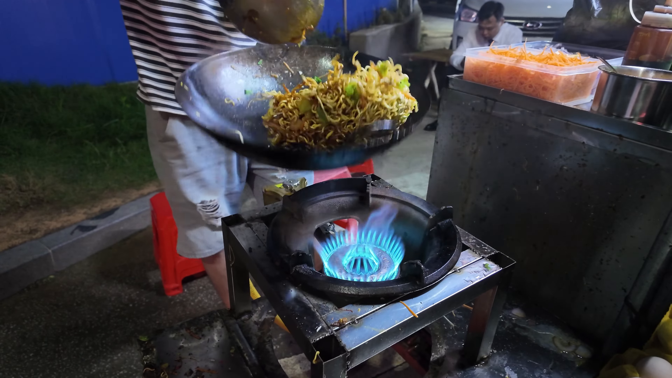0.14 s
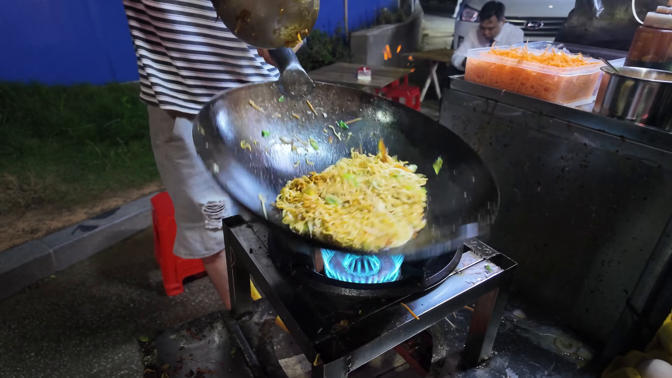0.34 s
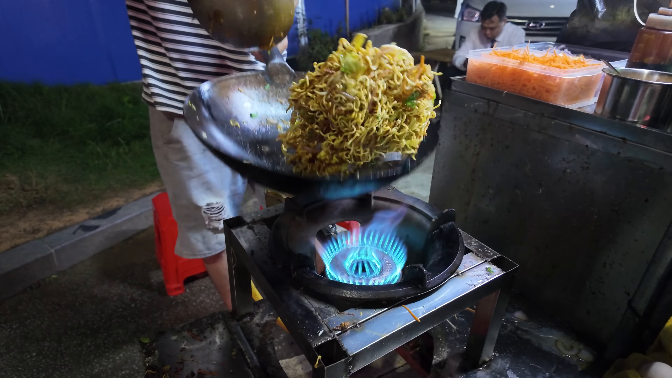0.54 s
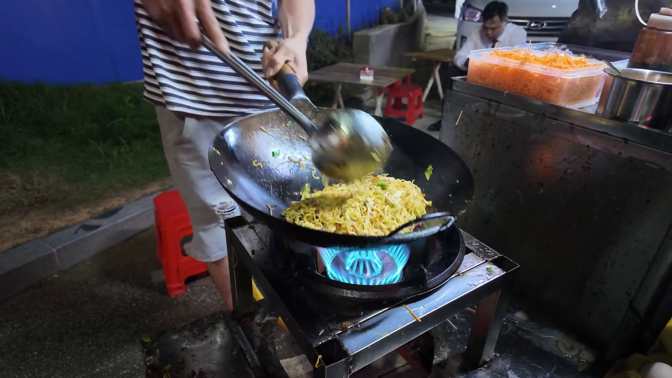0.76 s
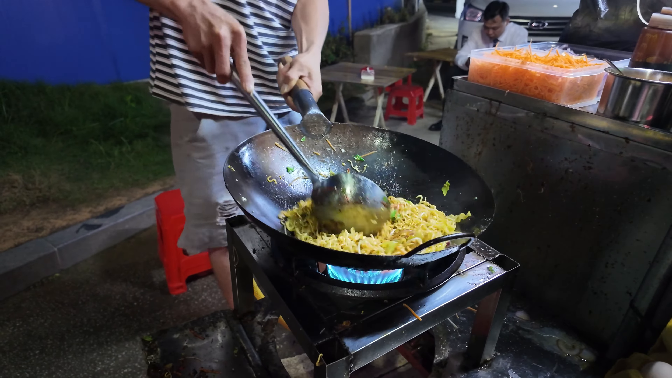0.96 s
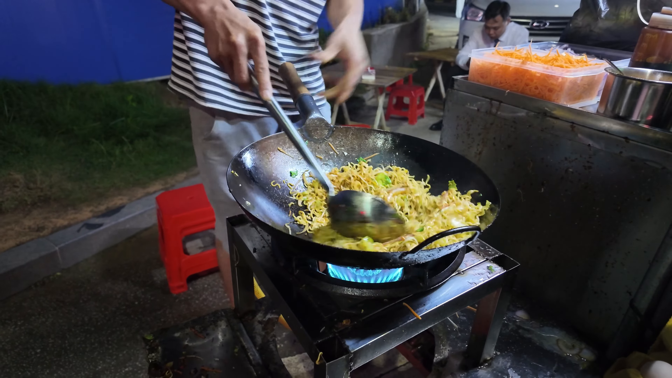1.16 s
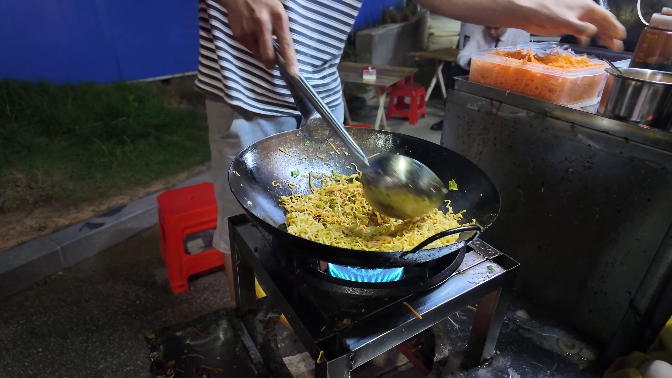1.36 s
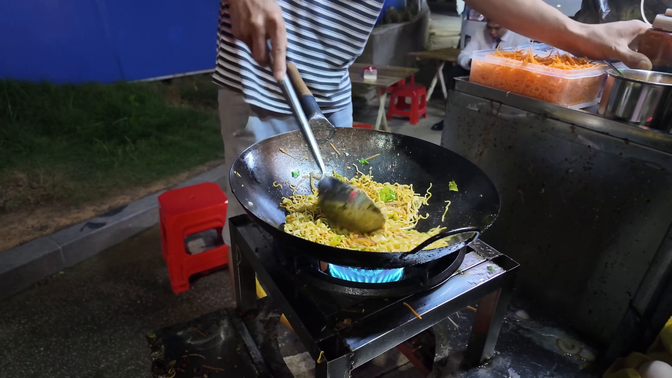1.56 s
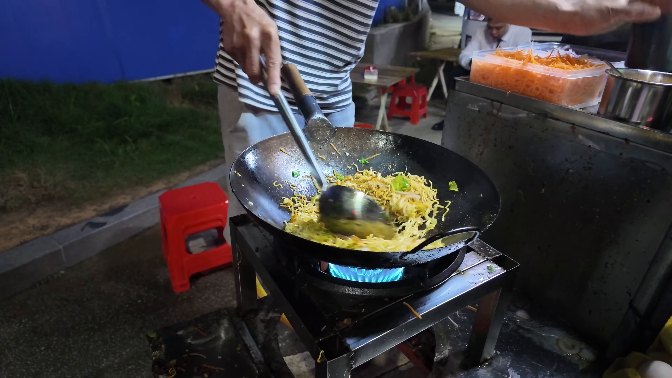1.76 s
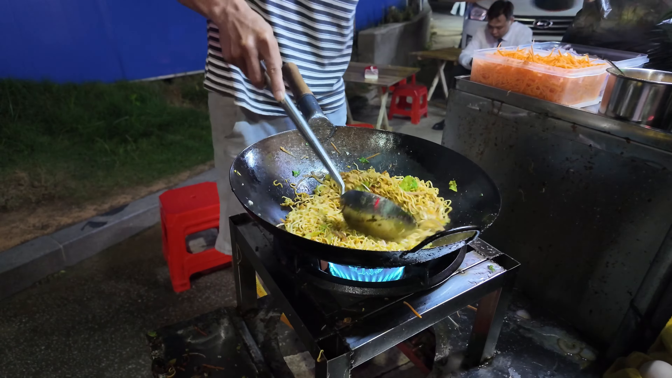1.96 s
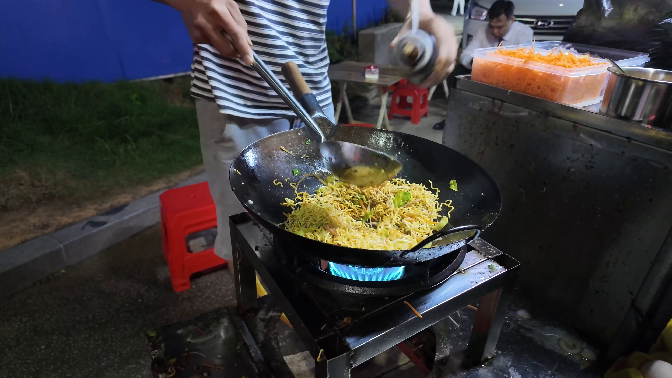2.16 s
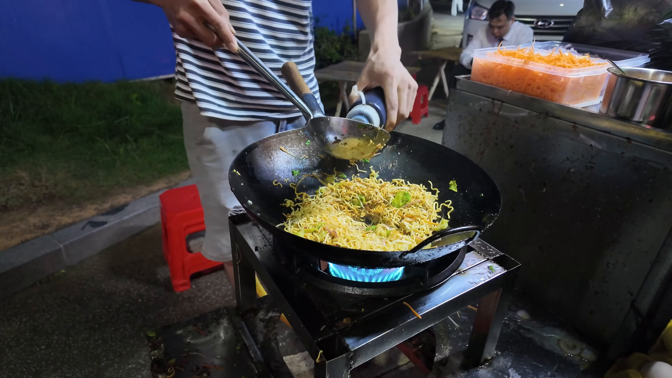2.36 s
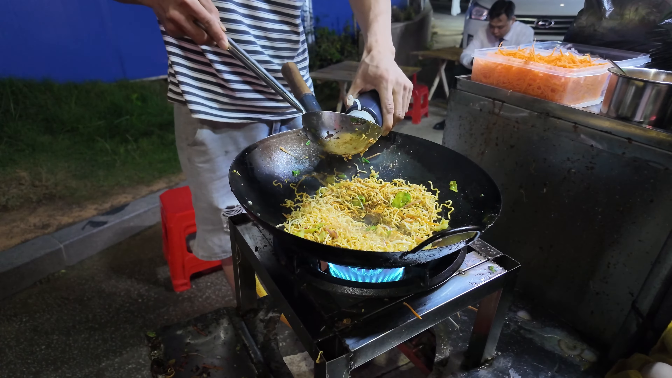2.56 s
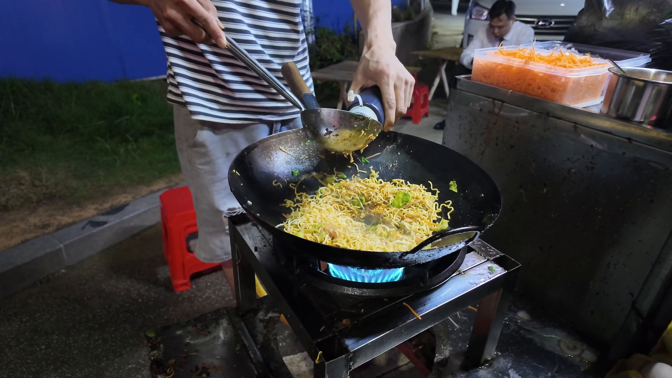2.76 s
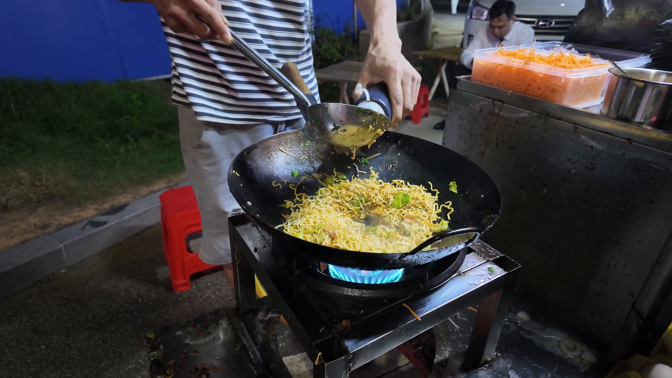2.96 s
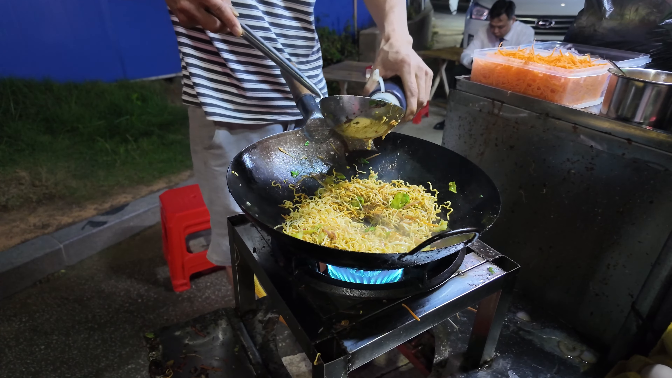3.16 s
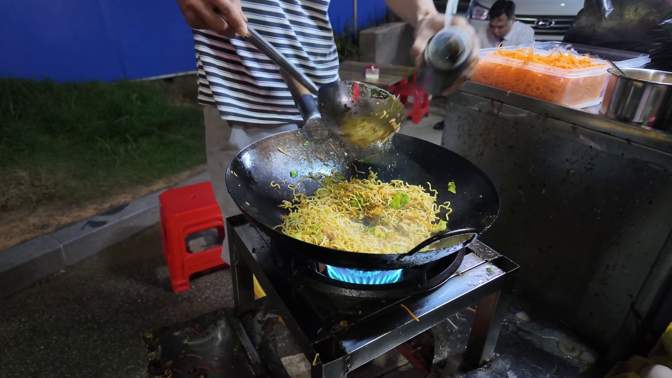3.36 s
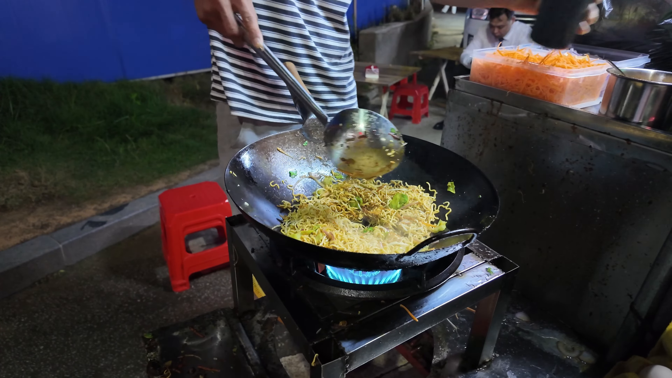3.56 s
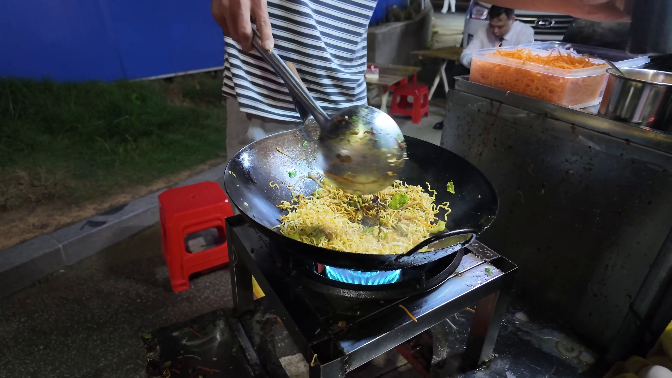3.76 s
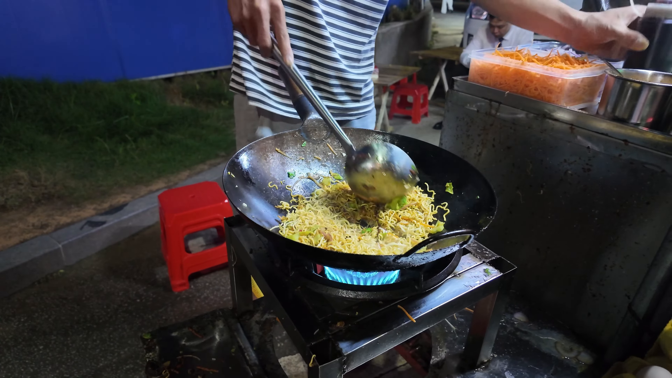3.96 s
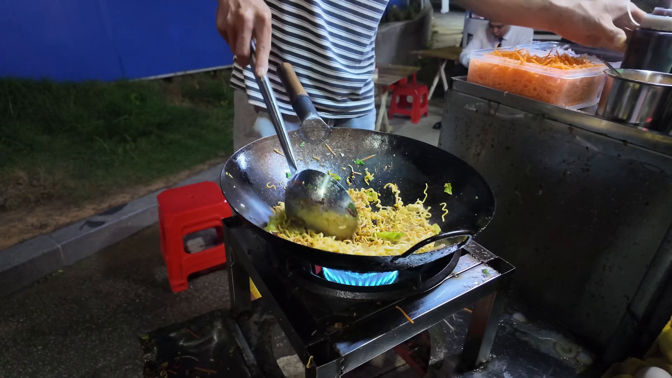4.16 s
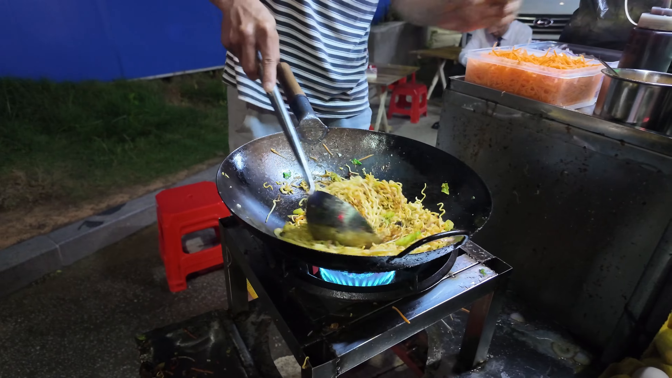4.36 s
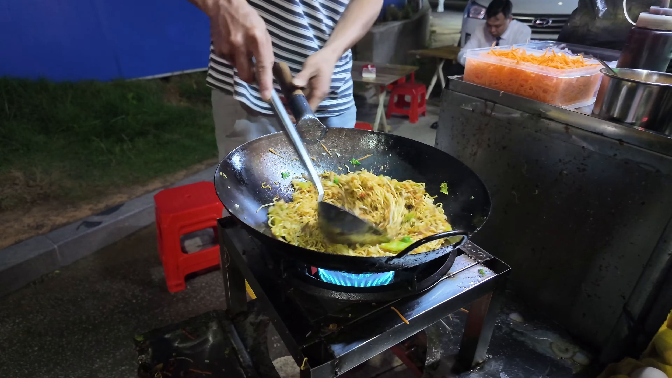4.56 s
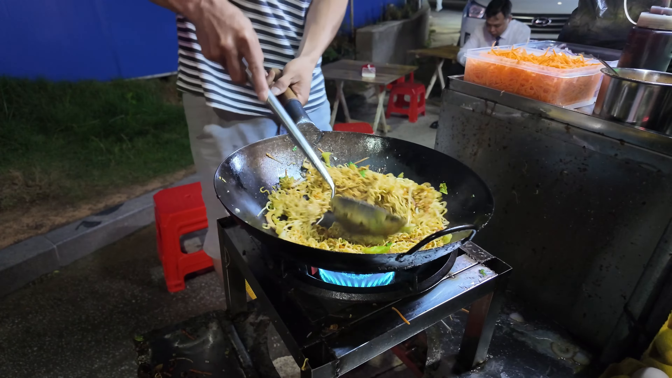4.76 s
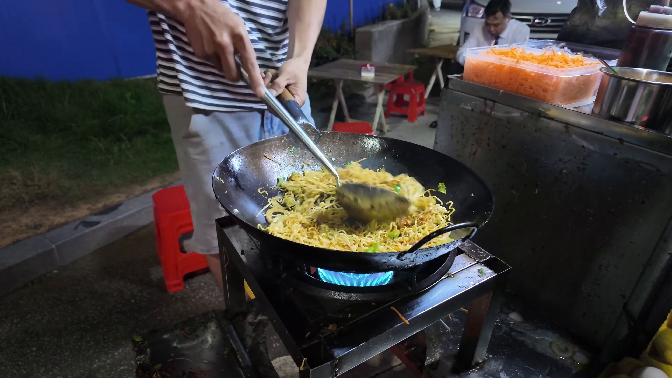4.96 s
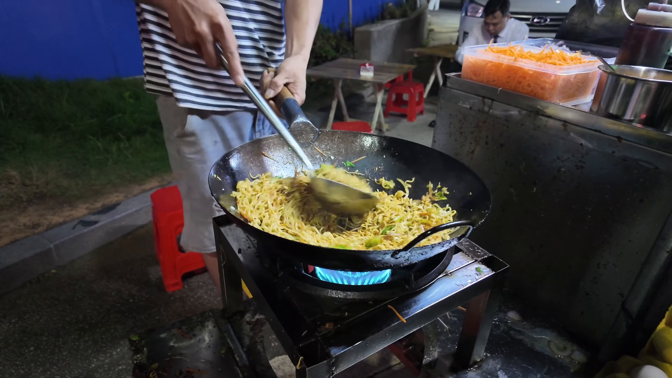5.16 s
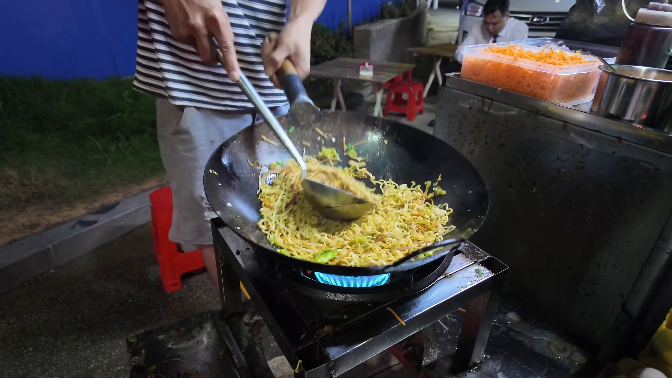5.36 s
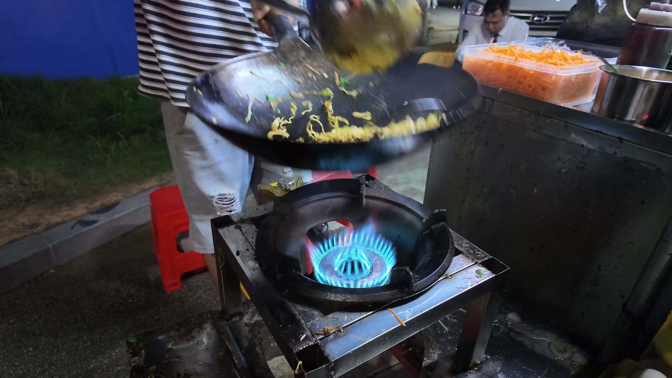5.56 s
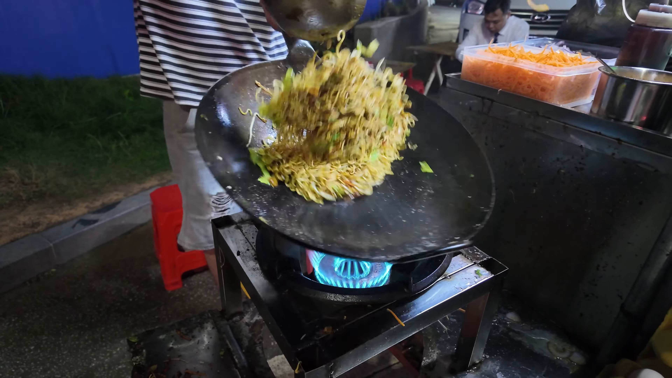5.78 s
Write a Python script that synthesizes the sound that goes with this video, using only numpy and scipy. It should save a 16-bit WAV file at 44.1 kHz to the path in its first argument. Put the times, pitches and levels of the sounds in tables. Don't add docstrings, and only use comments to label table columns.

```python
import sys
import numpy as np
from scipy import signal
from scipy.fft import rfft, irfft, next_fast_len
from scipy.io import wavfile
from scipy.ndimage import uniform_filter1d, map_coordinates

SR = 44100
rng = np.random.default_rng(int(sys.argv[2]) if len(sys.argv) > 2 else 0)


def persist_wave(psi):
    counts = np.round(np.clip(psi, -1, 1) * 32767).astype(np.int16)
    wavfile.write(sys.argv[1], SR, np.atleast_2d(counts).T)


def gain_from_db(level_db):
    decades = np.asarray(level_db, float) / 20
    return 10 ** decades


N = 256662

# [f/Hz, likeness/0-1]
LIKENESS = [(20, 0.97), (100, 1), (300, 0.98), (700, 0.83), (1400, 0.71), (2400, 0.92), (4500, 0.73),
            (7500, 0.64), (11000, 0.33), (15000, 0.46)]
# [f/Hz, lag/rad]
PORT_LAG = [(150, 0), (350, .17), (1400, .22), (5500, .25), (9600, .75), (13000, 1.1), (15800, 2.2)]
# [f/Hz, t60/s]
STALL_DECAY = [(200, 0.29), (2000, 0.076), (10000, 0.11)]

# [f/Hz, level/dB per Hz]
ROAR_COLOUR = [(18, -69), (30, -33), (46, -16), (59, -7), (91, -7.5), (123, -6), (157, -4.5), (225, -1.5),
               (295, -6.5), (360, -23.5), (470, -52), (790, -120)]
# [f/Hz, level/dB per Hz]
GAP_COLOUR = [(350, -45), (600, -26), (622, -14.5), (689, 0.5), (802, -2.5), (899, 2), (1250, -16.5),
              (1800, -27), (2340, -32), (3960, -120)]
# [f/Hz, level/dB per Hz]
JETS_COLOUR = [(250, -39), (340, -7), (420, 2), (500, 4.5), (600, -3), (700, -4.5), (1000, -37)]
# [t/s, level/dB]
GUSTS = [(.085, 10.5), (1.67, 3.5), (2.28, 0), (3.3, 4.5), (4.35, 2.5), (3.95, 6), (4.65, 7), (4.8, 3),
         (5.56, 9)]
# [t/s, lifted/0-1]
LIFTED = [
    (0, 1),
    (.69, 1),
    (.72, 0),
    (5.6, 0),
    (5.7, 1),
]
# [t/s, level/dB]
DRAUGHT = [(0, -2), (.3, -0.5), (1.5, 1.5), (2, -1), (3.3, 1), (3.6, -2.5), (3.8, 1), (4.25, -4), (5.1, 2),
           (5.5, 2.5), (5.82, -2)]
ROAR_DB, GAP_DB, JETS_DB = -49.5, -52.5, -59.5
GUST_S, GAP_SHARE, JETS_SHARE = 0.024, 0.2, 1
OPEN_GAP_DB, OPEN_JETS_DB = -2, 2.5

# [f/Hz, level/dB per Hz]
OIL_COLOUR = [(760, -26), (1300, -11), (1720, -12.5), (2220, -12.5), (2620, -11.5), (3900, -2.5),
              (4660, -2), (4910, -3.5), (6110, -3), (7080, -4.5), (12300, -2.5), (15800, -5.5)]
# [f/Hz, level/dB per Hz]
FIZZ_COLOUR = [(4000, -33), (8000, -6.5), (12500, -2), (15800, -1)]
# [f/Hz, level/dB per Hz]
SLIDE_COLOUR = [(500, -22), (1200, -16), (1700, -8), (2100, -1), (2900, -1), (3750, 2.5), (4600, -2),
                (6000, -7.5), (9000, -8.5), (15000, -45)]
# [t/s, level/dB]
SIZZLE = [(0, -52), (.2, -53.5), (.56, -65), (.7, -55), (.77, -38.5), (1.2, -38.5), (1.6, -39.5),
          (2.15, -40.5), (2.3, -39.5), (2.7, -43), (3.2, -46), (3.55, -49.5), (4.03, -46), (4.25, -42),
          (4.55, -35.5), (5.58, -38), (5.69, -63), (5.82, -49)]
# [t/s, spit level/dB, slide level/dB, half length/s]
STROKES = [(0.002, -33.5, -55, 0.066), (0.09, -35, -36, 0.049), (0.402, -30.5, -32.5, 0.063),
           (0.485, -52, -42, 0.023), (0.857, -41, -33.5, 0.066), (1.074, -36.5, -28.5, 0.032),
           (1.175, -39, -38, 0.092), (1.266, -40.5, -35.5, .04), (1.412, -39.5, -53, 0.026),
           (1.511, -40, -31.5, 0.021), (1.637, -56, -32, 0.063), (1.788, -37.5, -37.5, 0.03),
           (1.922, -38.5, -36, .04), (2.045, -33.5, -32, .03), (2.438, -42, -56, 0.01),
           (2.895, -46, -45, 0.028), (3.082, -44, -60, 0.013), (4.12, -37.5, -36, 0.045),
           (4.155, -50, -34.5, 0.023), (4.364, -38, -31.5, 0.079), (4.58, -34, -41, 0.041),
           (4.645, -37.5, -31.5, 0.027), (4.868, -34.5, -33, 0.033), (5.09, -34.5, -36.5, 0.037),
           (5.28, -31, -53, 0.035), (5.314, -33, -32.5, 0.024), (5.495, -36, -35, .055),
           (5.583, -34.5, -34, 0.051), (5.818, -34, -59, .015)]
SETTLE_DB, SETTLE_GROWS = -5, 1.3
FIZZ_DB, FIZZ_GROWS = -43.5, 2
SWELL_DB, SWELL_SHAPE, LINGER = 6, 1.385, 0.92

# [t/s, peak level/dB, sung mode f/Hz, skid length/s]
SKIDS = [(0.281, -28, 3500, 0.019), (0.285, -32, 2900, 0.017), (.283, -33, 4900, .01),
         (1.064, -19, 4000, 0.015), (1.075, -15, 2640, 0.026), (1.084, -19, 3400, 0.017),
         (1.087, -21, 4130, 0.036), (1.096, -17.5, 5470, 0.0066), (1.106, -20, 4420, .04),
         (1.129, -27, 4100, 0.047), (1.105, -25, 7300, 0.026), (1.11, -33, 5400, .02),
         (.09, -32, 6700, .015), (4.148, -31, 3900, 0.023)]
# [t/s, level/dB, f/Hz, t60/s, slap level/dB]
THUMPS = [
    (4.091, -15.5, 97.6, 0.007, -11.5),
    (4.13, -35.5, 74.8, 0.58, -8),
]

# [t/s, ring clank level/dB, bowl boom level/dB, wall level/dB, rim level/dB]
KNOCKS = [(0.713, -9, -12, -18, -10.5), (0.72, -16, -10.5, -11, -11), (0.744, -24, -16, -11.5, -17),
          (0.807, -49, -20.5, -28, -33), (0.89, -8, -14, -14.5, -24), (0.898, -32, -20.5, -15, -21),
          (0.918, -38, -19, -26, -26), (0.949, -13.5, -21, -16, -19), (0.982, -15.5, -10.5, -13, -24),
          (0.987, -11, -13.5, -7, -17), (1.018, -20, -24, -23, -37), (1.043, -18, -22.5, -25, -32),
          (1.066, -9.5, -19, -18, -25), (1.081, -29, -23, -38, -23), (1.136, -43, -26.5, -47, -37),
          (1.203, -21, -30, -24, -29), (1.251, -25.5, -30, -31, -42), (1.275, -49, -35.5, -58, -41),
          (1.314, -39, -37, -51, -42), (4.34, -33, -38, -27, -47), (4.775, -34, -43, -49, -55)]
# [f/Hz, level/dB, t60/s]
BOOM_MODES = [(196, -10, .1), (224, -1, .24), (235, -9, .12), (255, -12, .07), (335, -10, .07),
              (388, -15, .09), (440, -14, .16), (510, -13, .07)]
# [f/Hz, level/dB, t60/s]
CLANK_MODES = [(715, -1, .08), (822, 0, .06), (920, -7, .05), (1058, 2, .1), (1240, -5, .08)]
# [f/Hz, level/dB, t60/s]
WALL_MODES = [(1680, 1, 0.065), (1670, 0, 0.045), (1650, 3, 0.06), (2079, -14, 0.074), (2370, 4.5, 0.11),
              (2439, 5, 0.11), (2640, -3.5, 0.34)]
# [f/Hz, level/dB, t60/s]
RIM_MODES = [(3330, -3, .07), (3402, -3, .07), (3644, 0, .09), (3806, -2, .1), (3964, 0, .09),
             (4210, -3, .08), (4635, -4, .07), (5000, -5, .07)]
STRUCK_HZ, RIM_RAISES = 900, 0.022
CRASH_DB = -17


def unit(x):
    return x / np.sqrt(np.mean(x ** 2) + 1e-20)


def along(points, hz):
    f, v = np.transpose(points)
    return np.interp(np.log(hz + 1), np.log(f + 1), v)


def curves(rows):
    s, *columns = np.transpose(rows)
    return [np.interp(np.arange(N) / SR, s, column) for column in columns]


def wobble(rate):
    knots = rng.standard_normal(int(N * rate / SR) + 4)
    return map_coordinates(knots, [np.arange(N) * rate / SR])


def swell(s, half):
    t = np.arange(N) / SR - s
    return -SWELL_DB * np.where(t < 0, -t / half, t / (half * LINGER)) ** SWELL_SHAPE


def band(low_hz, high_hz, size):
    b, a = signal.butter(2, [low_hz, high_hz], "band", fs=SR)
    return unit(signal.lfilter(b, a, rng.standard_normal(size)))


def patchy(patchy_db):
    z = signal.stft(rng.standard_normal((2, N)), nperseg=256)[2]
    field = uniform_filter1d(rng.standard_normal(z.shape[1:]), size=5, axis=0)
    field = uniform_filter1d(field, size=8, axis=1)
    return unit(signal.istft(z * gain_from_db(patchy_db * unit(field)), nperseg=256)[1][:, :N])


def spread(pair, colour):
    m = next_fast_len(N + 8192)
    hz = np.fft.rfftfreq(m, 1 / SR)
    turn = np.arccos(np.clip(along(LIKENESS, hz), -1, 1)) / 2
    shares = [np.cos(turn), np.sin(turn)]
    mid, side = irfft(rfft(pair, m) * gain_from_db(along(colour, hz)) * shares, m)[:, :N]
    return unit(np.array([mid + side, mid - side]))


def add(track, s, sound):
    start = round(s * SR)
    track[..., start:start + sound.shape[-1]] += sound


def stall(x):
    out, block = np.zeros((2, N + SR)), SR // 12
    peaks = np.abs(x[:N // block * block]).reshape(-1, block).max(1)
    for start in np.flatnonzero(peaks > 1e-5) * block:
        hz, t, z = signal.stft(rng.standard_normal((2, SR // 4)), SR, nperseg=256)
        z[1] *= np.clip(hz / 9000, 0.05, 1)[:, None] ** 0.14
        fade = gain_from_db(-60 * t / along(STALL_DECAY, hz)[:, None])
        pair = signal.istft(z * fade, SR, nperseg=256)[1]
        mid, side = signal.lfilter(*signal.butter(2, 380, "high", fs=SR), pair)
        tail = np.array([mid + side, mid - side]) / np.linalg.norm(mid)
        add(out, start / SR + 0.003, signal.fftconvolve(x[None, start:start + block], tail, axes=1))
    return out[:, :N]


def fanned():
    gust_db = sum(db * gain_from_db(swell(s, GUST_S)) for s, db in GUSTS)
    up, = curves(LIFTED)
    draught_db, = curves(DRAUGHT)
    unrest_db = 1.2 * wobble(7)
    roar_db = ROAR_DB + gust_db - 0.15 * draught_db
    gap_db = GAP_DB + GAP_SHARE * gust_db + OPEN_GAP_DB * up + draught_db
    jets_db = JETS_DB + JETS_SHARE * gust_db + OPEN_JETS_DB * up + unrest_db
    return roar_db, gap_db, jets_db


def flame():
    roar_db, gap_db, jets_db = fanned()
    flicker = wobble(5.4)
    roar = gain_from_db(roar_db + 3.0 + 0.5 * flicker + 0.4 * wobble(30)) * spread(patchy(1.6), ROAR_COLOUR)
    jets = gain_from_db(jets_db + 3.0 + 0.76 * wobble(30)) * spread(patchy(4.0), JETS_COLOUR)
    gap = gain_from_db(gap_db + 3.0 + 0.96 * flicker + 0.21 * wobble(40)) * spread(patchy(1.0), GAP_COLOUR)
    return roar + jets + gap


def stirred():
    rest_db, = curves(SIZZLE)
    settle_db = -41 + SETTLE_DB + SETTLE_GROWS * (rest_db + 42.5)
    power = gain_from_db([rest_db, settle_db]) ** 2
    for s, spit_db, slide_db, half in STROKES:
        power = power + np.outer(gain_from_db([spit_db, slide_db]), gain_from_db(swell(s, half))) ** 2
    return 10 * np.log10(power)


def spurts(count, length):
    when, size = rng.random((count, 2)).T
    starts = np.bincount((when * N).astype(int), size ** 2, N)
    puff = np.exp(-np.arange(1200) / (length * SR))
    return np.abs(signal.fftconvolve(starts, puff)[:N])


def pops(count, scatter_db, low_hz, cycles):
    when, pitch, size, place = rng.random((count, 4)).T
    t = np.arange(96) / SR
    hz = low_hz * 4.5 ** pitch[:, None]
    shape = np.sin(2 * np.pi * hz * t) * np.exp(-t * hz / cycles)
    shape = shape * gain_from_db(scatter_db * size ** 2)[:, None]
    at = ((when * N).astype(int)[:, None] + np.arange(96)).ravel()

    def lay(gain):
        return np.bincount(at, (shape * gain[:, None]).ravel(), N + 96)[:N]

    return unit(np.array([lay(np.ones(count)), lay(2 * place - 1) * np.sqrt(3)]))


def frying():
    oil_db, slide_db = stirred()
    steam = spurts(count=500, length=0.0059)
    oil_pops = pops(count=2000, scatter_db=35, low_hz=3730, cycles=1.0)
    spit = patchy(1.22) * (1 + 0.63 * steam) + gain_from_db(-18) * oil_pops
    food_pops = pops(count=900, scatter_db=-6.0, low_hz=1930, cycles=2.5)
    rasp = patchy(1.74) * (1 + 0.45 * steam) + gain_from_db(-21.5) * food_pops
    oil = gain_from_db(oil_db + 5.5 + 0.53 * wobble(25)) * spread(spit, OIL_COLOUR)
    fizz = gain_from_db(FIZZ_DB + FIZZ_GROWS * (oil_db + 31.5)) * spread(spit, FIZZ_COLOUR)
    slide = gain_from_db(slide_db - 1.5 + 0.64 * wobble(35)) * spread(rasp, SLIDE_COLOUR)
    return oil + fizz + slide


def ladle():
    out, t = np.zeros(N + SR), np.arange(SR // 5) / SR
    for s, db, hz, length in SKIDS:
        slip = rng.standard_normal(len(t)) * np.exp(-(t / length) ** 2)
        mode = np.sin(2 * np.pi * hz * t) * gain_from_db(-60 * t / 0.02)
        sung = signal.fftconvolve(slip, mode)
        add(out, s, gain_from_db(db) * sung / np.abs(sung).max())
    for s, db, hz, t60, slap_db in THUMPS:
        press = np.clip(t / 0.0023, 0, 1) * gain_from_db(-60 * np.clip(t - 0.022, 0, None) / t60)
        slap = gain_from_db(slap_db) * band(135, 640, len(t)) + gain_from_db(slap_db - 5) * band(870, 4000, len(t))
        squelch = np.clip(t / 0.0028, 0, 1) * gain_from_db(-60 * t / 0.17)
        add(out, s, gain_from_db(db) * (squelch * slap - press * np.sin(2 * np.pi * hz * t)))
    return out[:N]


def ring(modes, t):
    total = 0
    for hz, db, t60 in modes:
        strength = gain_from_db(db + rng.normal(0, 2.5) - 60 * t / t60)
        total = total + strength * np.sin(2 * np.pi * hz * rng.normal(1, 0.008) * t)
    return total


def chattering():
    chatter = gain_from_db(-60 * np.arange(4000) / SR / 0.029) * rng.standard_normal(4000) * (rng.random(4000) < 0.08)
    chatter[0] = 2.2
    return chatter / np.linalg.norm(chatter)


def crashing(clank_db, wall_db, rim_db, t):
    crash = gain_from_db(clank_db + CRASH_DB) * band(740, 1010, len(t))
    crash += gain_from_db(wall_db - 10) * band(1580, 2360, len(t))
    crash += gain_from_db(rim_db - 4.5) * band(2870, 4840, len(t))
    crash += gain_from_db(rim_db - 11) * band(3900, 12500, len(t))
    grain = gain_from_db(3.15 * rng.standard_normal(len(t) // 60 + 1).repeat(60)[:len(t)])
    return gain_from_db(-60 * t / 0.091) * (1 - np.exp(-t / 0.0012)) * crash * grain


def wok():
    out, t = np.zeros(N + SR), np.arange(SR // 3) / SR
    waits = np.diff([row[0] for row in KNOCKS] + [N / SR])
    for (s, clank_db, boom_db, wall_db, rim_db), wait in zip(KNOCKS, waits):
        chatter = chattering()
        raised = RIM_RAISES * (rim_db - clank_db)
        favoured = [(hz, db - 22 * abs(np.log2(hz / STRUCK_HZ) - raised), t60) for hz, db, t60 in CLANK_MODES]
        add(out, s, gain_from_db(clank_db - 5.5) * ring(favoured, t) * (1 - np.exp(-t / 0.00036)))
        sheet = gain_from_db(wall_db - 19.0) * ring(WALL_MODES, t) + gain_from_db(rim_db - 11) * ring(RIM_MODES, t)
        add(out, s, signal.fftconvolve(sheet, chatter))
        choke = gain_from_db(-60 * np.clip(t - wait, 0, None) / 0.012)
        jolt = gain_from_db(-13 - 60 * t / 0.16) * band(69, 90, len(t))
        body = gain_from_db(-3.5 - 60 * t / 0.07) * band(218, 450, len(t))
        boom = ring(BOOM_MODES, t) * choke + jolt + body
        add(out, s, gain_from_db(boom_db + 4.0) * boom * (1 - np.exp(-t / 0.0034)))
        add(out, s, crashing(clank_db, wall_db, rim_db, t))
    return out[:N]


def scene():
    steel = wok() + ladle()
    return gain_from_db(-2.5) * steel + gain_from_db(-10) * stall(steel) + flame() + frying()


def band_limit(x):
    return signal.sosfilt(signal.butter(12, 15990, fs=SR, output="sos"), x)


def record(dry):
    m = next_fast_len(N + 8192)
    hz = np.fft.rfftfreq(m, 1 / SR)
    lag = np.exp(0.5j * along(PORT_LAG, hz) * np.array([[-1], [1]]))
    bass_cut = 1 / np.sqrt(1 + (52 / (hz + 1)) ** 5)
    ports = lag * bass_cut * (hz < 15950)
    mix = irfft(rfft(dry, m) * ports, m)[:, :N]
    return band_limit(mix)


dry = scene()
out = record(dry)
persist_wave(out)
```